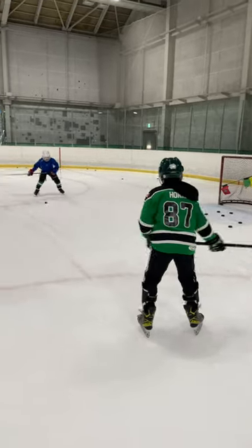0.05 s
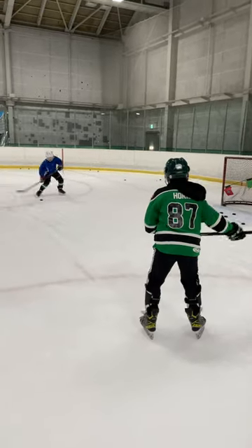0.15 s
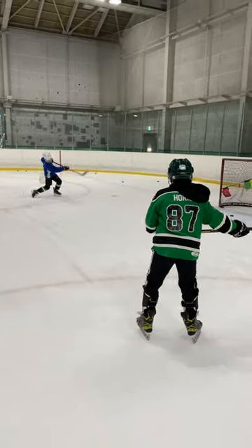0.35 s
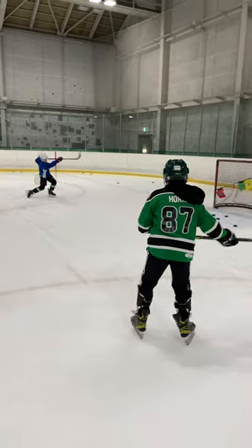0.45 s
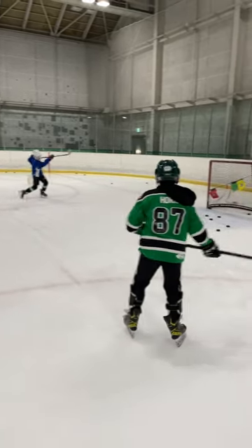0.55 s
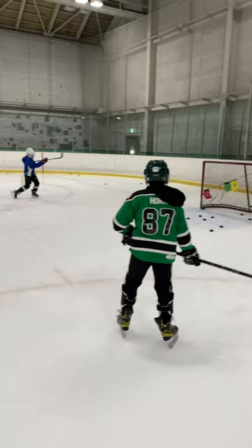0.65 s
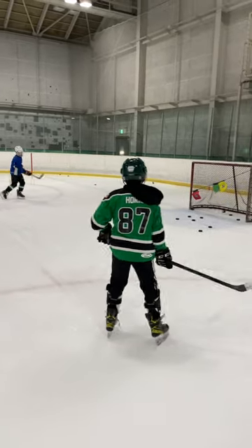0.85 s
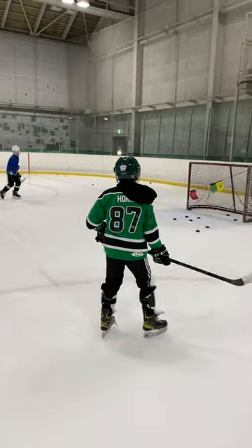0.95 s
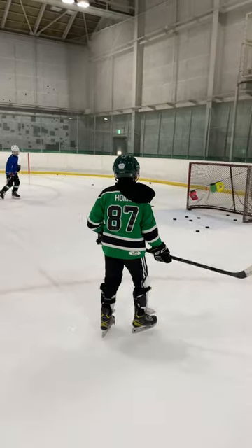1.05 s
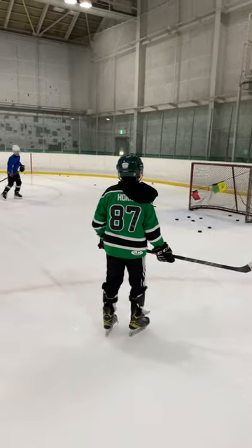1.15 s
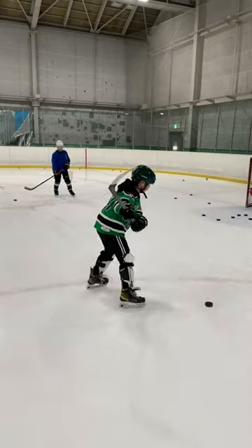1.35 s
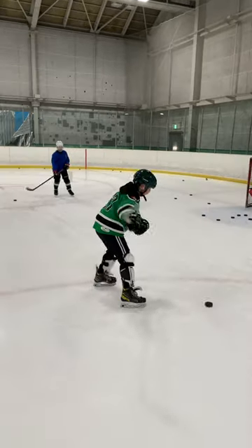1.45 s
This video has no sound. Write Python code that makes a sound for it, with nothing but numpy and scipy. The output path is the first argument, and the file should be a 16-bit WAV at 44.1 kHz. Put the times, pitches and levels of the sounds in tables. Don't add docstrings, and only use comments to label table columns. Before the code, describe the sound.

A distant hockey stick cracks sharply on ice and puck, then the puck clangs off the steel goal post; the frame knocks and rattles, ringing through a large hall over low plant hum, heard from across the ice.

```python
import sys
import numpy as np
from scipy import signal
from scipy.fft import rfft, irfft
from scipy.io import wavfile

SR = 44100
rng = np.random.default_rng(int(sys.argv[2]) if len(sys.argv) > 2 else 0)


def makeup_ratio(level_db):
    decades = np.asarray(level_db, float) / 20
    return 10 ** decades


def master_out(mix):
    frames = np.transpose(np.atleast_2d(mix))
    ceiling = np.clip(frames, -1, 1)
    pcm = np.round(ceiling * 32767).astype(np.int16)
    wavfile.write(sys.argv[1], SR, pcm)


N = 66150
T = np.arange(N) / SR
CHANGE_S = 1.271


def cut(x, kind, hz, order):
    return signal.sosfilt(signal.butter(order, hz, kind, fs=SR, output="sos"), x)


def at_hz(points, hz):
    table = np.array(points)
    return np.interp(np.log(hz), np.log(table[:, 0]), table[:, 1])


def rms_one(x):
    return x / np.sqrt(np.mean(x ** 2) + 1e-20)


def fft_hz():
    return np.arange(N // 2 + 1) * SR / N + 1


def struck(blows, modes, contact_s):
    out, width, rise_s = np.zeros(N), 500, 0.00032
    shape = np.exp(-T[:width] / contact_s) * (1 - np.exp(-T[1:width + 1] / rise_s))
    grit = rng.standard_normal((len(blows), len(modes), width))
    for k, (hz, db, t60) in enumerate(modes):
        force = np.full(N + width, 1e-18)
        probe = np.exp(-2j * np.pi * hz * np.arange(width) / SR)
        for j, blow in enumerate(blows):
            colour_db = 0
            if len(blow) > 2:
                colour_db = -max(blow[3], 0) * np.log2(hz / blow[2]) ** 2
            start = int(blow[0] * SR)
            rough = shape * grit[j, k]
            size = np.abs(np.sum(rough * probe)) + np.linalg.norm(rough)
            force[start:start + width] += rough / size * makeup_ratio(blow[1] + db + colour_db)
        r = makeup_ratio(-60 / (max(t60, .002) * SR))
        w = 2 * np.pi * min(hz, 18000) / SR
        out += signal.lfilter([.5, 0, -.5], [1, -2 * r * np.cos(w), r * r], force)[:N]
    return out


# pitch in Hz, time to fall by 60 dB in seconds.
HALL_DECAY = [(150, 2.5), (500, 2.26), (1000, 2.39), (3000, 1.053), (6000, 0.7), (12000, 0.55)]
# pitch in Hz, side minus middle in dB.
HALL_WIDTH = [(60, -65), (110, -42), (200, -28), (380, -8.5), (700, -7), (1290, -5.5), (2380, 2),
              (4400, -0.5), (8120, 0), (15000, 3)]
# pitch in Hz, level in dB.
MIDDLE_DIP = [(2850, 0), (3080, -2.5), (3650, -7), (3950, -0.5)]


def diffuse(spectrum, dying=False):
    out = 0
    edges = 25 * 2 ** np.arange(0, 9.4, 1 / 3)
    white = rng.standard_normal((2, 2, N))
    for k, (low, high) in enumerate(zip(edges, edges[1:])):
        hz = np.sqrt(low * high)
        fall_db = 60 * T / at_hz(HALL_DECAY, hz) if dying else 0
        gain = makeup_ratio(at_hz(spectrum, hz) - fall_db)
        width = makeup_ratio([[0], [at_hz(HALL_WIDTH, hz)]])
        out = out + gain * width * cut(white[k % 2], "band", [low, high], order=2)
    mid = cut(out[0], "low", 7800, order=12)
    side = cut(out[1], "high", 290, order=3)
    mid = irfft(rfft(mid) * makeup_ratio(at_hz(MIDDLE_DIP, fft_hz())), N)
    return np.array([mid + side, mid - side])


# pitch in Hz, left ahead of right in radians.
LEFT_LEAD = [(100, -.05), (1100, -.9), (1550, -.7), (1900, .9), (2400, .45), (3350, 2.2), (4900, .8),
             (9000, 2.9)]
# pitch in Hz, left minus right in dB.
LEFT_BALANCE = [(150, 0), (300, 1), (800, -3), (1650, -7.5), (2400, -2), (3400, .7), (5000, -.7)]


def direct(x):
    hz = fft_hz()
    half = makeup_ratio(at_hz(LEFT_BALANCE, hz) / 2) * np.exp(.5j * at_hz(LEFT_LEAD, hz))
    return irfft(rfft(x) * np.array([half, 1 / half]), N)


def hall(x, colour, envelope):
    tail = diffuse(colour, dying=True) * envelope
    return signal.fftconvolve(x[None], tail, axes=1)[:, :N]


def microphone_hiss():
    return makeup_ratio(-70.5) * cut(rng.standard_normal(N), "high", 6000, order=2) * [[1], [-1]]


# pitch in Hz, level in dB per Hz.
AIR_COLOUR = [(25, -37), (45, -9.5), (75, -13.5), (130, -8), (212, -12.5), (476, -21), (5880, -50),
              (9000, -62)]


def air():
    return makeup_ratio(-42.5) * rms_one(diffuse(AIR_COLOUR))


# multiple of the motor speed, level in dB rms, beats per second,
# time of a loudest point in seconds, and the same after the scene changes in seconds.
PLANT_HUM = [
    (2, -39.5, 0.84, 0.56, 1.3),
    (3, -40.5, 0.94, 0.9, 1.52),
    (4, -46.5, 0.52, 0.21, 4.2),
    (5, -47.5, 0.45, 0.04, 0.79),
]


def drone():
    out, motor_hz = 0, 33.74
    for multiple, db, beat, first_s, second_s in PLANT_HUM:
        loudest_s = np.where(T < CHANGE_S, first_s, second_s)
        swell = np.cos(np.pi * beat * (T - loudest_s))
        tone = np.sin(2 * np.pi * (multiple * motor_hz * T + rng.random()))
        out = out + np.sqrt(2) * makeup_ratio(db) * swell * tone
    return direct(out)


def scrape():
    start_s, level_db, t60_s = 1.4775, -41.5, 0.017
    modes = [(hz, -1, t60_s) for hz in (1400, 2000, 2700)]
    return direct(struck([(start_s, level_db)], modes, 0.0011))


# pitch in Hz, level in dB per Hz.
EARLIER_COLOUR = [(150, -49.5), (250, -12.5), (332, -1), (736, -8.5), (1120, -6), (1700, -13.5),
                  (2520, -10.5), (7410, -38.5), (9000, -60.5), (11700, -93), (19800, -120)]


def earlier_shot():
    start_db, fall_db_per_s = -37, 2.5
    return makeup_ratio(start_db - fall_db_per_s * T) * rms_one(diffuse(EARLIER_COLOUR))


# loudest at seconds, pitch in Hz, level in dB rms, half width in seconds.
GOAL_SWELLS = [(.649, 770, -20, .004), (.680, 490, -29, .022), (.724, 490, -34, .015),
               (.718, 748, -27, .03), (.680, 895, -31, .015), (.755, 555, -37, .03), (.745, 428, -37, .03),
               (.835, 742, -34, .025), (.830, 895, -33, .022), (.884, 897, -34, .018),
               (.912, 739, -32, .024), (.950, 425, -41, .03), (.985, 895, -40, .025),
               (1.000, 745, -40, .02), (1.040, 745, -38, .02), (1.086, 737, -33, .03),
               (.688, 4045, -38, .006), (1.027, 4100, -42, .005), (1.045, 4080, -46, .004),
               (1.055, 4080, -47, .003), (1.077, 4080, -46, .012), (1.088, 2520, -46, .01),
               (1.14, 4050, -55, .02), (1.23, 4050, -57, .02), (.6607, 900, -10, .0022),
               (1.0386, 1080, -21, .0016), (1.0228, 1150, -23, .002), (.785, 742, -38, .025)]


def goal_swells():
    s, hz, db, wide_s = np.transpose(GOAL_SWELLS)[:, :, None]
    tones = np.sin(2 * np.pi * (hz * T + rng.random((len(GOAL_SWELLS), 1))))
    swells = np.exp(-((T - s) / wide_s) ** 2)
    return direct(np.sum(np.sqrt(2) * makeup_ratio(db) * swells * tones, axis=0))


# start in seconds, peak level in dB.
SHARP_HITS = [
    (.2343, -43.5),
    (.2505, -41.5),
    (.2840, -42),
    (.3200, -46.5),
    (.6376, -36),
    (.644, -47.5),
    (1.0216, -48.5),
    (1.035, -57.5),
    (1.254, -54),
]
# pitch in Hz, level in dB, time to fall by 60 dB in seconds.
SHARP_TONES = [(10500, -2.5, .004), (13800, 2, .004), (15000, 5, .008), (15900, -4.5, .01)]


def cracks():
    return struck(SHARP_HITS, SHARP_TONES, .0012)


# start in seconds, peak level in dB, brightest at Hz,
# fall-off in dB per octave squared.
POST_HITS = [(.6374, -5.5, 5300, 2), (.6402, -10, 3000, 3), (.644, -25, 2300, -3), (.653, -22, 3000, -5.5),
             (.660, -26, 3000, -5.5), (.666, -14.5, 2680, 9.5), (.684, -28.5, 4030, 8.5),
             (.700, -23.5, 2690, 12), (.716, -17, 2540, 22.5), (.738, -37, 2600, 7.5), (.990, -44, 8000, 4),
             (1.0216, -29, 5100, 1), (1.0245, -21.5, 4200, 18), (1.039, -32, 3500, 4.5),
             (1.070, -35, 3500, 11.5), (1.095, -28.5, 3100, 22), (1.2540, -30.5, 1690, 8),
             (1.2580, -36.5, 3000, -11.5), (1.268, -54.5, 2000, 4)]
# pitch in Hz, level in dB, time to fall by 60 dB in seconds.
POST_TONES = [(1497, 3, 0.022), (1945, -6, 0.04), (2234, -1, 0.02), (2597, -3, 0.017), (3000, 1, 0.0032),
              (3500, 4.5, 0.0019), (4045, -8, 0.04), (4380, -16, 0.025), (4940, -9, 0.012),
              (5215, -3, 0.016), (5610, -2, 0.012), (6835, 5.5, 0.0023), (9700, -17.5, 0.004),
              (15300, -10.5, 0.01)]
# start in seconds, peak level in dB, fullest at Hz,
# fall-off in dB per octave squared.
FRAME_KNOCKS = [(.6470, -13, 800, 5), (.6592, -8, 900, 5), (.674, -12, 550, 1), (.687, -17, 600, 1),
                (.704, -17, 700, 1), (.717, -13.5, 750, 1), (.731, -15.5, 800, 1), (.742, -19, 600, 1),
                (.761, -16, 800, 1), (1.0214, -13, 950, 5), (1.0258, -14, 950, 4), (1.031, -18, 900, 2),
                (1.0376, -17, 1100, 5), (1.05, -24, 1000, 1), (1.071, -26, 750, 2), (1.105, -23, 900, 2)]
# pitch in Hz, level in dB, time to fall by 60 dB in seconds.
FRAME_TONES = [(244, -22, 0.05), (326, -25, 0.05), (420, -20, 0.06), (494, -16, 0.16), (536, -12.5, 0.065),
               (650, -16, .05), (739, -17, 0.12), (752, -17, 0.12), (830, -15, .04), (895, -18, .12),
               (940, -10, 0.034), (1160, -12.5, 0.024), (1470, -24, 0.012)]
# pitch in Hz, level in dB, time to fall by 60 dB in seconds.
THUMP_TONES = [(847, 8.5, .010), (1194, -1.5, 0.018)]
# pitch in Hz, level in dB.
GOAL_HALL_COLOUR = [(200, -2), (500, -1), (850, -7), (1500, -3), (2500, -2), (3400, -3), (4300, -0.5),
                    (9000, -20)]


def goal():
    rattle = struck(FRAME_KNOCKS, FRAME_TONES, 0.00095)
    thump = struck(FRAME_KNOCKS, THUMP_TONES, .0004)
    knocks = cut(rattle + thump, "low", 1200, order=2)
    x = cut(struck(POST_HITS, POST_TONES, 0.0015) + knocks, "high", 193, order=3)
    hall_db, rise_s, early_db, early_s = -37.5, .008, 18, 0.025
    rise = 1 - np.exp(-(T / rise_s) ** 2)
    swell = rise * makeup_ratio(hall_db + early_db * np.exp(-T / early_s))
    bounce_db = 1 * (T > .9)
    return direct(x) + hall(x * makeup_ratio(bounce_db), GOAL_HALL_COLOUR, swell)


# start in seconds, peak level in dB,
# brightest at Hz, fall-off in dB per octave squared.
SLAP_HITS = [(.2343, -2, 1500, 1.17), (.2385, -10, 900, 2), (.2468, -10.5, 1100, 1.5),
             (.2505, -5, 2600, 0.5), (.2530, -6, 600, 1.5), (.2615, -17, 6500, 2), (.2630, -19, 800, 2),
             (.2688, -16.5, 1960, 2), (.2840, -3, 3700, 13), (.2875, -19, 600, 0),
             (.2950, -13.5, 2800, 9.5), (.3020, -17, 1500, 2), (.3045, -4, 2700, 6), (.3065, -9.5, 500, 5),
             (.3200, -10, 2800, 1), (.3245, -16, 1500, 2), (.432, -15, 2500, 8), (.527, -19, 1200, 4)]
# pitch in Hz, level in dB, time to fall by 60 dB in seconds.
STICK_TONES = [(211, -2.5, 0.026), (473, 0, 0.019), (746, 1.5, 0.0073), (993, 5, 0.011),
               (1570, 0.5, 0.0074), (2326, 7.5, 0.0044), (2850, 0, 0.0087), (3410, 2, 0.0062),
               (3910, -2, .006), (4800, 0.5, 0.0018), (5620, 1.5, 0.0021), (7530, 5.5, 0.0016),
               (9150, -7.5, 0.017), (15300, -26, .008)]
# pitch in Hz, level in dB.
SLAP_HALL_COLOUR = [(150, -1.5), (280, -8.5), (500, -2.5), (1100, -4), (2500, -6), (3500, -2.5), (5000, -2),
                    (9000, -7)]


def slap():
    x = cut(struck(SLAP_HITS, STICK_TONES, 0.0019), "high", 142, order=3)
    hall_db, rise_s = -30.5, 0.08
    wall_s, wall_wide_s, wall_db = 0.284, 0.033, 4.5
    rise = 1 - np.exp(-(T / rise_s) ** 2)
    end_wall = np.exp(-((T - wall_s) / wall_wide_s) ** 2)
    swell = rise * makeup_ratio(hall_db + wall_db * end_wall)
    return direct(x) + hall(x, SLAP_HALL_COLOUR, swell)


def scene():
    before = np.clip((CHANGE_S - T) / 0.0015, 0, 1)
    earlier = earlier_shot()
    tick = scrape()
    hiss = microphone_hiss()
    play = slap() + goal() + goal_swells() + cracks() + earlier
    return before * play + drone() + air() + tick + hiss


def band_limit(x):
    return signal.sosfilt(signal.butter(12, 16850, fs=SR, output="sos"), x)


# time in seconds, gain in dB.
AUTO_GAIN = [
    (0, -0.7),
    (.24, -2),
    (.29, -1),
    (.36, -12),
    (.5, -7),
    (.64, -1),
    (.7, -0.5),
    (.9, 0),
    (1.5, -1),
]


def record(dry):
    x = dry * makeup_ratio(np.interp(T, *np.transpose(AUTO_GAIN)))
    hold = np.exp(-1 / (.04 * SR))
    power = cut(x.mean(axis=0), "high", 400, order=2) ** 2
    loudness = np.sqrt(signal.lfilter([1 - hold], [1, -hold], power))
    top_hiss = rms_one(cut(rng.standard_normal(N), "band", [15000, 15900], order=3))
    x = x + makeup_ratio(-61) * loudness * top_hiss
    ceiling = 1.05
    return band_limit(ceiling * np.tanh(x / ceiling))


dry = scene()
out = record(dry)
master_out(out)
```